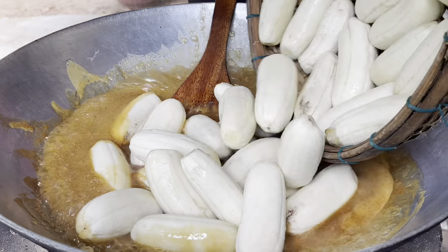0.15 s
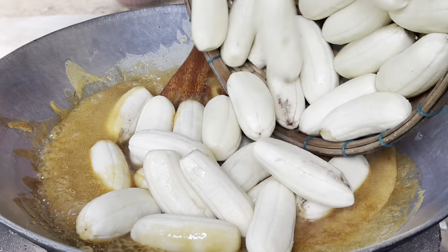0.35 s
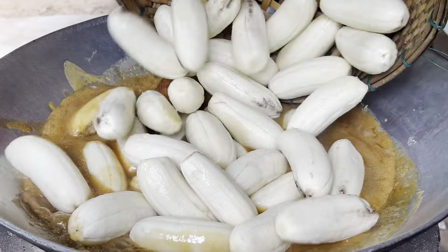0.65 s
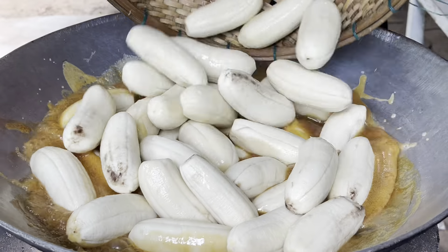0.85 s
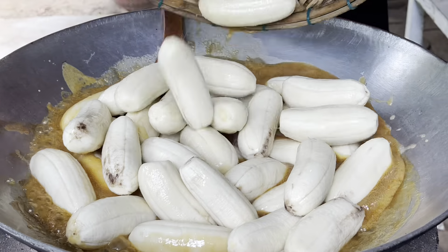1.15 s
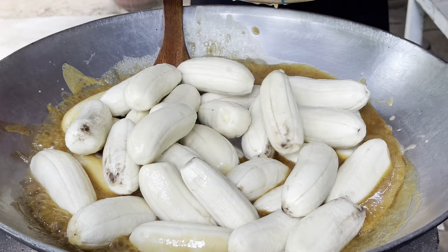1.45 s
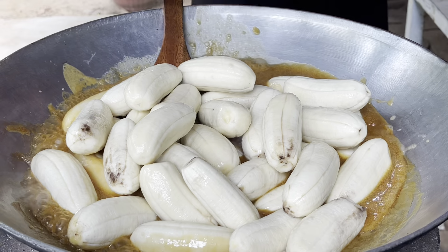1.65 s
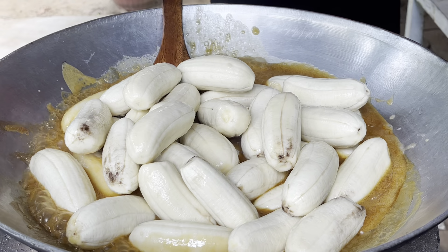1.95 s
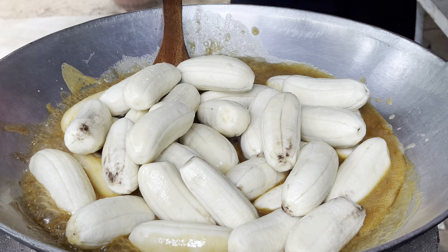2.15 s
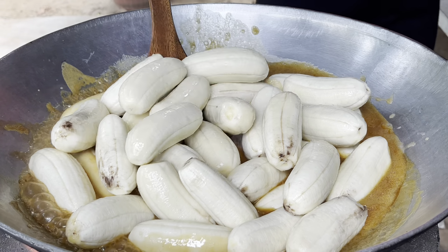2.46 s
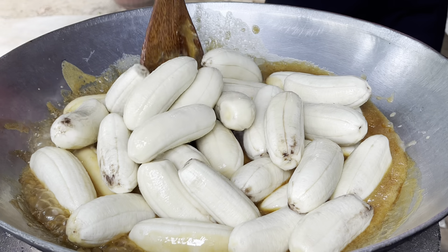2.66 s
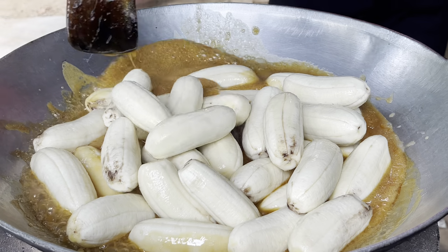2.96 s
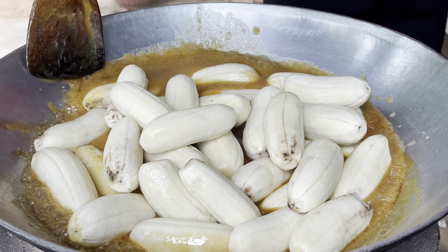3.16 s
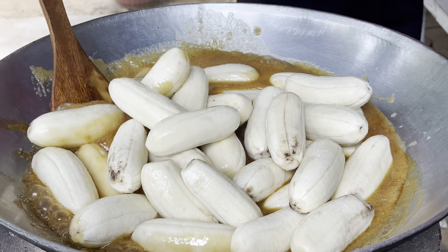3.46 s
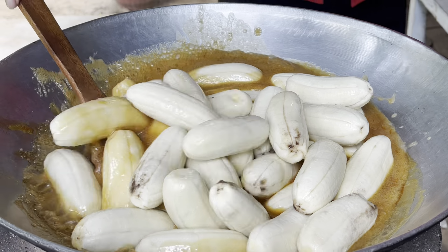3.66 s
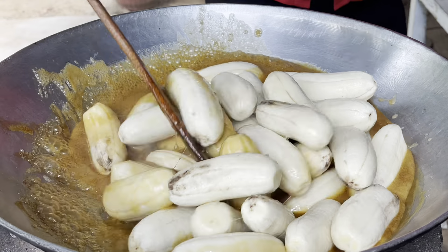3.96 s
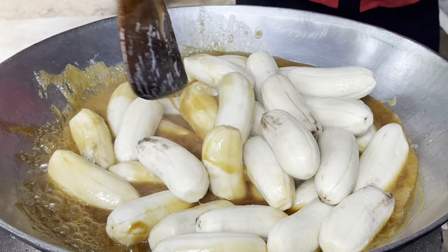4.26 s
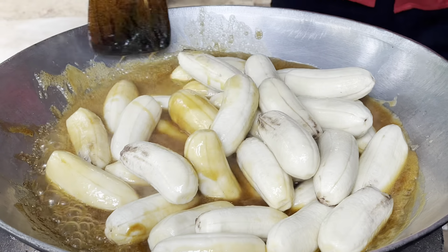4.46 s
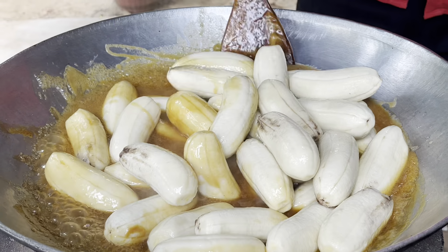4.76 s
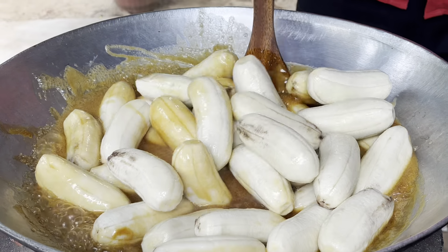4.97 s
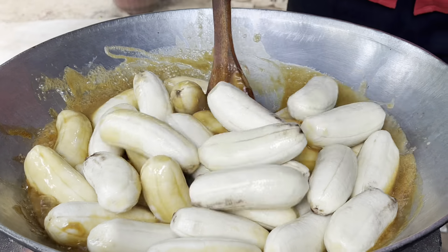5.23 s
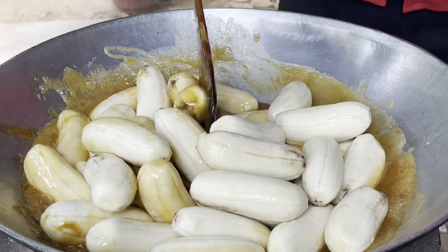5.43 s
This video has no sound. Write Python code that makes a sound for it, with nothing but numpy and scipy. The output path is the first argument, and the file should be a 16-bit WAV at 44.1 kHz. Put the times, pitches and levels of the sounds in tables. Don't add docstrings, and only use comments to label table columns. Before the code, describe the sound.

Close on a steel wok outdoors, syrup simmers with fine hiss and foamy bubbling. Fruit tumbles in with a light tray tap, soft thumps and one sharp burst of steam. Spitting and plopping follow, then a wooden spatula knocks and scrapes the metal before softer, wet stirring. A small engine throbs low in the background.

```python
import sys
import numpy as np
from scipy import signal
from scipy.fft import rfft, irfft, next_fast_len
from scipy.io import wavfile

SR = 44100
rng = np.random.default_rng(int(sys.argv[2]) if len(sys.argv) > 2 else 0)


def wav_record(signal):
    frames = np.transpose(np.atleast_2d(signal))
    bounded = np.clip(frames, -1, 1)
    quanta = np.round(bounded * 32767).astype(np.int16)
    wavfile.write(sys.argv[1], SR, quanta)


def voltage_ratio(level):
    return 10 ** (np.asarray(level, float) / 20)


N = 246959
SIZE = next_fast_len(N + SR // 4)
HZ = np.maximum(np.arange(SIZE // 2 + 1) * SR / SIZE, 1)

# (place [strokes], level [dB])
PUFFS = [
    (0.597, 2.5),
    (1.601, 4),
    (2.15, -4.5),
    (2.6, -4.5),
]
# (time [s], firing rate [strokes/s])
ENGINE_SPEED = [(0, 15.74), (1.2, 15.79), (3.4, 16.25), (4.2, 16.55), (5.0, 16.64), (5.6, 16.64)]
# (frequency [Hz], width [Hz], level [dB])
EXHAUST_PIPE = [(50.1, 30, -3), (61.5, 17.3, -1), (91.8, 9.6, -12.5), (127.4, 8, -21), (31.93, 2.8, -11)]
# (frequency [Hz], level [dB per Hz])
ROAR = [(25, -17), (35, -8), (60, -2.5), (85, -6), (130, -5.5), (160, -16), (300, -26.5), (500, -28.5)]
FIRST_STROKE, ENGINE_DB, ROAR_DB = -.185, -42, -49

# (time [s], level [dB])
BOIL = [(0.0, -50), (0.34, -54.5), (0.61, -52.5), (1.06, -39), (1.43, -44.5), (2.0, -49.5), (2.46, -54),
        (2.68, -49.5), (2.95, -53.5), (3.23, -51), (3.37, -37), (3.52, -46.5), (3.98, -46), (4.5, -52),
        (4.86, -46.5), (5.1, -54.5), (5.44, -57.5), (5.6, -53)]
# (frequency [Hz], level [dB per Hz])
HISS = [(2500, -31.5), (4000, -11), (6500, -5.5), (7500, -3), (8200, -3.5), (9000, -0.5), (10300, 1),
        (11000, -6), (12000, -16), (14000, -29), (15800, -19)]
# (frequency [Hz], level [dB per Hz])
SIMMER = [(1200, -31), (1900, -7), (2250, 0), (2550, -2), (2900, -3.5), (3300, -4.5), (4500, -8),
          (6000, -16)]
# (frequency [Hz], level [dB per Hz])
STEAM = [(600, -40), (1800, -18), (2600, -7.5), (3500, -8.5), (4500, -7), (6000, -4), (7500, -0.5),
         (9000, 2), (10300, 6), (11000, -1), (13000, -15), (14000, -23), (15900, -19)]
# (frequency [Hz], level [dB per Hz])
THUMP = [(110, 3), (200, -1), (330, -5.5), (480, -11), (700, -10)]
# (frequency [Hz], level [dB per Hz])
SLOSH = [(350, -5), (600, -9), (950, 1.5), (1300, -2), (1700, -2.5), (2300, -11.5)]
# (time [s], length [s], syrup level [dB], fruit level [dB])
TUMBLES = [
    (.05, .5, -85, -51.5),
    (.55, 0.097, -67, -47.5),
    (.78, 0.091, -47.5, -40.5),
    (1.0, 0.1, -74, -51),
    (1.43, 0.18, -55, -57),
    (2.4, 1, -52.5, -76),
    (2.88, 0.07, -52.5, -64),
    (3.1, 0.14, -57, -47.5),
]
# (time [s], length [s], syrup level [dB], fruit level [dB], blade level [dB])
STIRS = [(3.387, 0.091, -40, -50, -56), (3.534, 0.11, -62, -44.5, -49), (3.642, 0.044, -47, -42.5, -43.5),
         (3.789, 0.072, -51, -47.5, -47), (3.985, 0.064, -76, -54, -47), (4.29, 0.14, -51, -62, -52),
         (4.58, 0.025, -48, -56.5, -51), (4.703, 0.045, -67, -71, -46), (4.741, 0.065, -49.5, -64, -52),
         (4.832, .05, -45, -73, -51), (4.917, 0.064, -47, -57, -57), (5.034, 0.047, -52, -60, -73)]
MEAN_BOIL_DB = -50
SIMMER_DB, SIMMER_FOLLOWS = -49.5, 0.32
SLOSH_DB, SLOSH_FOLLOWS = -52.5, 0.21
THUMP_DB, THUMP_FOLLOWS = -55.5, 0.035
SWELL_DB = 8.5
FOAM_UNDER_DB, BODY_OVER_DB, BARED_UNDER_DB = -1.5, 7, -5
SPLASH_S, BURST_DB, SWELL_AFTER_S = .724, -25.5, 0.065
STEAM_DB, STEAM_DB_PER_S, LINGER_DB, LINGER_DB_PER_S = -24.5, 85, -36.5, 45
SLOSH_LEFT_DB = 4

# (time [s], peak [dB], t60 [s])
SPITS = [(0.0508, -30, 0.057), (0.722, -20, 0.036), (0.728, -3.5, 0.022), (1.057, -35, 0.032),
         (1.296, -36, .04), (1.326, -23, 0.056), (1.609, -39, 0.027), (1.683, -43, 0.026),
         (2.163, -31, .04), (2.241, -29, 0.043), (2.347, -30, .03), (2.412, -28, 0.043), (2.815, -37, .03),
         (3.126, -30, 0.048), (4.448, -34, 0.036), (4.518, -49, 0.032), (4.71, -39, 0.037),
         (5.226, -35, .04), (5.266, -31.5, 0.047), (5.516, -33, .04), (1.4167, -22, 0.045),
         (1.47, -26.5, 0.72), (1.552, -27, 0.16), (1.753, -27, 0.05), (1.8, -25, 0.079),
         (1.824, -27.5, 0.16), (1.872, -26, 0.074), (1.8894, -27, 0.081), (1.977, -24.5, 0.061),
         (2.0046, -24, 0.05), (2.0857, -26.5, 0.05), (2.108, -27, 0.17), (2.369, -25.5, 0.04),
         (2.486, -29, 0.19), (2.56, -26.5, 0.055), (2.625, -26.5, 0.09), (2.6978, -31, 0.05),
         (2.825, -24.5, 0.025), (2.8844, -31.5, 0.055), (2.9851, -29, 0.05), (3.208, -27, 0.047),
         (3.697, -12, 0.023), (3.949, -25.5, 0.16), (4.131, -30, 0.05), (4.258, -26.5, 0.049),
         (4.574, -26.5, 0.042), (4.6708, -28, 0.059), (4.845, -28.5, 0.13)]
SMALL_SPITS, SMALL_SPIT_DB, SMALL_SPIT_T60_S = 3, -36, 0.06
# (frequency [Hz], level [dB], t60 [s])
SNAP = [(3600, -10, 0.006), (7850, -14, .004), (9100, -2, 0.0071), (11300, -10, 0.0045)]
# (time [s], peak [dB], hardness [dB per octave])
SNAPS = [
    (.7235, -24, 1),
    (.7283, -12, 1.5),
    (.73, -13, -0.5),
    (.7307, -16, -1),
    (.7837, -27, -5),
    (3.6975, -23, 0.5),
    (.5232, -33, -1),
    (1.8734, -31, 3),
]

# (frequency [Hz], level [dB], t60 [s])
RIM = [(655, -4, 0.06), (866, -3, 0.06), (1540, -4.5, 0.46), (2148, 6, 0.31), (2772, -6, .05)]
# (time [s], peak [dB], hardness [dB per octave])
RIM_TAPS = [
    (0.5232, -33, -0.6),
    (.55, -46, -7),
    (0.7627, -36, -2),
]

# (time [s], peak [dB], pitch [Hz], t60 [s])
RINGS = [(0.5445, -37, 664, 0.053), (0.546, -37, 870, 0.059), (3.088, -32, 904, 0.26),
         (3.089, -35, 441, 0.066), (3.091, -33, 280, 0.054), (3.089, -41, 600, .04),
         (3.092, -40, 1090, .06), (3.447, -30, 380, .03), (3.53, -39, 900, .15), (3.553, -37, 900, .1),
         (3.6205, -30, 770, .07), (0.985, -35, 320, .06), (5.22, -41, 330, .06), (4.6, -41, 200, .07),
         (0.5228, -37, 850, .015), (3.412, -20, 4500, .02), (3.638, -32, 950, .08), (3.64, -27, 430, .08),
         (3.693, -36, 900, .12), (3.4055, -18, 9400, .012), (3.4063, -16, 8020, .02),
         (3.4128, -15, 8300, .025), (3.421, -15, 8700, .025), (3.416, -22, 6800, .02),
         (3.43, -22, 7300, .02), (3.4062, -18, 11400, .008), (3.4065, -20, 5600, .015),
         (3.413, -20, 11000, .01), (3.424, -21, 5800, .02), (3.6284, -31, 3500, .015),
         (3.64, -31, 2710, .02), (3.625, -33, 310, .04), (3.629, -36, 940, .05), (4.1324, -33, 11600, .006),
         (4.1326, -40, 14200, .005), (4.2587, -38, 11600, .006), (4.2, -39, 11500, .006),
         (4.8019, -39, 11500, .008), (5.206, -42, 12500, .004), (2.108, -36, 12500, .005),
         (1.8734, -38, 13500, .004), (4.575, -35, 2560, .03), (4.634, -38, 2610, .03),
         (4.71, -37, 1740, .03), (4.715, -42, 5800, .02), (4.85, -41, 5400, .03), (4.855, -40, 4800, .04),
         (4.82, -36, 1005, .04), (4.4, -39, 1280, .03), (5.296, -45, 5170, .03), (3.329, -19, 5000, .015),
         (2.7, -38, 3300, .03), (2.888, -37, 4700, 0.032)]
RING_RISE_CYCLES = 4.4
# (time [s], peak [dB], pitch [Hz], t60 [s])
PLOPS = [(0.552, -41, 312, 0.029), (0.699, -28, 205, 0.024), (0.761, -47, 249, 0.037),
         (0.844, -28.5, 200, 0.034), (0.988, -32, 201, 0.049), (3.211, -30.5, 232, 0.036),
         (3.251, -41, 236, 0.04), (4.56, -35, 300, 0.044), (4.805, -44, 1226, 0.092),
         (4.869, -40, 1250, 0.033), (4.892, -44, 1190, 0.044), (5.026, -40, 862, 0.074),
         (5.205, -27, 930, 0.013), (4.672, -37, 3970, 0.033), (4.712, -47, 4150, .025),
         (4.759, -38.5, 1090, .04), (4.823, -40, 1166, .06), (4.836, -38, 1500, 0.056),
         (4.894, -41, 2240, .025), (4.997, -46, 3250, .03), (5.015, -43, 2980, .035),
         (5.06, -49, 2650, .035), (5.146, -48, 3200, .03), (5.207, -45, 4800, .02),
         (5.406, -46, 3800, 0.033)]

# (frequency [Hz], level [dB], t60 [s])
BOWL = [(440, -7, 0.22), (810, -12, 0.058), (911, -0.6, 0.2), (946, -11, 0.087), (986, -7, 0.09),
        (1064, -14, 0.18), (1402, -8, 0.1), (1846, -15, 0.13), (2000, -26, 0.059)]
# (frequency [Hz], level [dB], t60 [s])
BLADE = [(271, -7.5, 0.061), (357, -13, 0.045), (430, 3.5, 0.05), (479, -3, 0.054), (634, -9, 0.06)]
# (frequency [Hz], level [dB], t60 [s])
EDGE = [(2590, -18, .04), (2760, -15, 0.034), (2975, -6, 0.034), (3130, 1.5, 0.039), (3490, -1, 0.034),
        (3550, -1, 0.024)]
# (frequency [Hz], level [dB], t60 [s])
BELLY = [(790, -4, 0.5)]
# (time [s], peak [dB], hardness [dB per octave])
KNOCKS = [(3.091, -33.5, -5), (3.325, -22, -4), (3.334, -28, 7), (3.347, -27, 12.5), (3.361, -33, 12),
          (3.377, -38, 0), (3.425, -27, 0.5), (3.437, -33, 1), (3.46, -50, 3), (3.489, -39, 2),
          (3.501, -38, 6), (3.53, -43, -1), (3.552, -33.5, -0.4), (3.624, -43, -3), (3.638, -32, 5),
          (3.649, -34, -1), (3.66, -36, -4), (3.696, -31.5, 2), (3.719, -42, 3), (3.779, -46, -7)]
# (time [s], peak [dB], hardness [dB per octave])
THUDS = [(3.088, -36.5, -5), (3.3225, -18, 4), (3.338, -22, 4), (3.347, -32, 3), (3.3535, -17, 2),
         (3.372, -30, 12), (3.3785, -17.5, 1.5), (3.394, -28, -5), (3.408, -36, 2), (3.426, -19, 10),
         (3.431, -24, -3), (3.446, -27, 3), (3.511, -37, 1), (3.523, -38, 6), (3.539, -35, 1),
         (3.556, -41, 6), (3.586, -39, 3), (3.607, -40, 4), (3.625, -34, -9), (3.643, -28, -1),
         (3.655, -34, 1), (3.695, -30, 3), (3.713, -36.5, -9), (3.753, -47, 4), (3.799, -40, 4)]
# (time [s], peak [dB], hardness [dB per octave])
CLINKS = [
    (3.3285, -12, -1.3),
    (3.338, -23, -.4),
    (3.35, -22, 0.26),
    (3.36, -20, .1),
    (3.368, -25, .4),
    (3.4072, -13, -0.048),
    (3.411, -16.5, .1),
    (3.4145, -15.5, .1),
]
# (time [s], peak [dB], hardness [dB per octave])
BELLY_TAP = [
    (3.645, -34, .1),
]
# (time [s], held [s], body [dB], rasp [dB], sizzle [dB])
JABS = [
    (3.315, 0.056, -30.5, -20, -22.5),
    (3.386, 0.012, -51, -38, -46),
    (3.4045, 0.017, -36, -32.5, -18.5),
]
# (frequency [Hz], level [dB per Hz])
RASP = [(900, -32), (1400, -3.5), (2200, 0), (3100, 4.5), (3900, -1), (4800, -1.5), (5500, -3.5)]
# (frequency [Hz], level [dB per Hz])
BARED = [(2500, -11), (5000, -7.5), (6500, -2), (8300, -0.5), (10300, 0.5), (11500, -7.5), (12600, -31)]
BITE = 0.17
RASP_SAG_DB_PER_S, LIFT_DB_PER_S, SIZZLE_HELD_S, SIZZLE_DB_PER_S = 114, 302, 0.01, 311

# (time [s], length [s], start [Hz], end [Hz], level [dB])
WHEEZES = [
    (3.779, .13, 2960, 2735, -47.5),
    (3.881, 0.34, 2590, 2363, -47.5),
    (4.663, 0.1, 5660, 5400, -54),
    (4.8, 0.06, 1150, 1350, -47),
    (4.705, 0.094, 1900, 1746, -49.5),
    (4.899, 0.073, 1144, 938, -53),
    (4.982, 0.11, 3040, 2387, -52.5),
    (5.424, 0.16, 3196, 2380, -56),
]
WHEEZE_WIDTH = .07
# (time [s], length [s], start [Hz], end [Hz], level [dB])
CHIRPS = [(5.255, .1, 5130, 5330, -54), (5.41, .06, 3780, 3760, -53), (4.95, .11, 3720, 3700, -54),
          (5.09, .11, 3260, 3230, -55), (5.412, .06, 3200, 3170, -50), (5.45, .14, 3190, 3160, -53),
          (5.45, .06, 2900, 2850, -55), (5.51, .06, 2600, 2550, -55), (5.3, .1, 3330, 3400, -57),
          (4.84, .09, 4880, 4800, -53)]

# (frequency [Hz], right channel lead [turns], scattered sound [dB])
PORTS = [(60, .014, -32), (150, .05, -22), (260, .035, -30), (440, .03, -30), (750, .09, -13),
         (1400, .04, -12), (2300, 0, -20), (3300, -.09, -13), (5000, -.03, -14), (6800, 0, -17),
         (7800, -.03, -16), (8500, 0, -22), (9300, 0, -11), (12000, 0, -20)]
SLIP_FROM_HZ, HZ_PER_TURN = 8600, 3300
PEAK, CUTOFF_HZ = .62, 16300
QUIET_DB, UNDER_FRAME_DB, UNDER_OTHER_DB, GATE_FROM_HZ = -88.5, -23, -14, 2050


def rms_one(x):
    return x / np.sqrt(np.mean(x ** 2) + 1e-20)


def in_time(rows):
    s, *columns = np.transpose(rows)
    return [np.interp(np.arange(N) / SR, s, c) for c in columns]


def on_hz(rows):
    hz, *columns = np.transpose(rows)
    return [np.interp(np.log(HZ), np.log(hz), c) for c in columns]


def coloured(x, spectrum):
    octaves_below = np.maximum(np.log2(spectrum[0][0] / HZ), 0)
    octaves_above = np.maximum(np.log2(HZ / spectrum[-1][0]), 0)
    gain = voltage_ratio(on_hz(spectrum)[0] - 19 * (octaves_below + octaves_above))
    return rms_one(irfft(rfft(x, SIZE) * gain, SIZE)[:N])


def bandpass(x, low_hz, high_hz):
    return signal.sosfilt(signal.butter(2, [low_hz, high_hz], "band", fs=SR, output="sos"), x)


def drift(rate):
    r = np.exp(-80 * np.pi * rate / SR)
    slow = signal.lfilter([1], [1, -2 * r, r * r], rng.standard_normal(N // 40 + 2002))[2000:]
    return np.interp(np.arange(N) / 40, np.arange(len(slow)), rms_one(slow))


def ring(clicks, hz, t60):
    r, w = voltage_ratio(-60 / (t60 * SR)), 2 * np.pi * hz / SR
    return signal.lfilter([0, np.sin(w)], [1, -2 * r * np.cos(w), r * r], clicks + 1e-18)


def grains(per_s, spread_db):
    sizes = voltage_ratio(spread_db * np.minimum(rng.exponential(1, N), 5)) * rng.choice([-1, 1], N)
    return rms_one(sizes * (rng.random(N) < per_s / SR))


def bubbling(spectrum, per_s, spread_db, patchy_db, shared_db):
    octaves = np.log2(spectrum[-1][0] / spectrum[0][0])
    edges = spectrum[0][0] * .7 * 2 ** np.arange(0, octaves + 1.2, .5)
    edges = np.minimum(edges, .47 * SR)
    clicks = [grains(per_s, spread_db), grains(per_s, spread_db)]
    out = 0
    for k, (low, high) in enumerate(zip(edges, edges[1:])):
        if high > low:
            out = out + voltage_ratio(patchy_db * drift(18.7)) * bandpass(clicks[k % 2], low, high)
    return coloured(out, spectrum) * voltage_ratio(shared_db * (drift(11.5) + 0.074 * drift(24)))


def struck(hits, modes, scatter_db, below_db):
    rows, out = np.array(hits), np.zeros(N)
    chance = rng.standard_normal((len(rows), len(modes)))
    for k, (hz, level_db, t60) in enumerate(modes):
        clicks = np.zeros(N)
        level_db = level_db - below_db + rows[:, 2] * np.log2(hz / 600) + scatter_db * chance[:, k]
        clicks[(rows[:, 0] * SR).astype(int)] = voltage_ratio(rows[:, 1] + level_db)
        out += ring(clicks, hz, t60)
    return out


def swell(s, attack, hold, peak_db, fall_db_per_s, sag_db_per_s=0):
    t = np.arange(N) / SR - s
    lost_db = sag_db_per_s * np.clip(t - attack, 0, hold) + fall_db_per_s * np.maximum(t - attack - hold, 0)
    return np.clip(t / attack, 0, 1) ** 2 * voltage_ratio(peak_db - lost_db)


def heaves(rows, column, over_db=0):
    t = np.arange(0, N + 64, 64) / SR
    power = sum(voltage_ratio(row[column] + over_db - SWELL_DB * np.abs(t - row[0]) / row[1]) ** 2 for row in rows)
    return np.interp(np.arange(N) / SR, t, np.sqrt(power))


def stirred_up(steady_db, follows, column, over_db=0):
    steady = voltage_ratio(steady_db + follows * (in_time(BOIL)[0] - MEAN_BOIL_DB))
    return 20 * np.log10(np.hypot(steady, heaves(TUMBLES + STIRS, column, over_db)))


def engine():
    strokes = FIRST_STROKE + np.cumsum(in_time(ENGINE_SPEED)[0]) / SR
    puffs = np.zeros(N)
    for place, level_db in PUFFS:
        at = np.flatnonzero(np.diff(np.floor((strokes - place) / 3)) > 0)
        puffs[at] = voltage_ratio(level_db + 0.79 * rng.standard_normal(40)[:len(at)])
    puffs[0] = voltage_ratio(1.0)
    throb = 0
    for hz, width, level_db in EXHAUST_PIPE:
        t60 = np.log(1000) / (np.pi * width)
        throb = throb - voltage_ratio(level_db) * rms_one(ring(ring(puffs, hz, t60), hz, t60))
    return voltage_ratio(ENGINE_DB) * throb + voltage_ratio(ROAR_DB) * coloured(rng.standard_normal(N), ROAR)


def syrup():
    hiss_db = in_time(BOIL)[0]
    hiss = voltage_ratio(hiss_db + 4.0) * bubbling(HISS, per_s=4500, spread_db=3.0, patchy_db=1.55, shared_db=1.0)
    top = signal.sosfiltfilt(signal.butter(2, 10500, "high", fs=SR, output="sos"), hiss)
    hiss = hiss + (voltage_ratio(0.32 * np.minimum(hiss_db + 39.5, 0)) - 1) * top

    simmer_db = stirred_up(SIMMER_DB, SIMMER_FOLLOWS, column=2, over_db=FOAM_UNDER_DB)
    foam = bubbling(SIMMER, per_s=5000, spread_db=1.5, patchy_db=1.5, shared_db=0.77)
    simmer = voltage_ratio(simmer_db + 0.75) * foam

    burst = swell(SPLASH_S, 0.003, 0, BURST_DB, 180)
    billow = swell(SPLASH_S, SWELL_AFTER_S, 0, STEAM_DB, STEAM_DB_PER_S)
    linger = swell(SPLASH_S, SWELL_AFTER_S, 0, LINGER_DB, LINGER_DB_PER_S)
    splash = np.hypot(burst + billow, linger) * coloured(grains(5000, spread_db=4.2), STEAM)

    thump_db = stirred_up(THUMP_DB, THUMP_FOLLOWS, column=3)
    thump = voltage_ratio(thump_db - 1.5) * bubbling(THUMP, per_s=600, spread_db=2.0, patchy_db=3.0, shared_db=1.8)
    return hiss + simmer + splash + thump


def slosh():
    wash = bubbling(SLOSH, per_s=2500, spread_db=2.0, patchy_db=1.0, shared_db=0.88)
    born, dealt = grains(260, spread_db=3.5), rng.integers(0, 14, N)
    bubbles = sum(ring(born * (dealt == k), hz, 8.8 / hz) for k, hz in enumerate(np.geomspace(700, 1800, 14)))
    slosh_db = stirred_up(SLOSH_DB, SLOSH_FOLLOWS, column=2)
    stirred = voltage_ratio(1.04 * (slosh_db + 49.0) - 10.5)
    return voltage_ratio(slosh_db - 1.5) * (wash + stirred * rms_one(bubbles))


def spits():
    level = np.zeros(N)
    chance = rng.random((SMALL_SPITS, 2))
    small = [(s * N / SR, SMALL_SPIT_DB + 8 * (d - .5), SMALL_SPIT_T60_S) for s, d in chance]
    for s, peak_db, t60 in SPITS + small:
        i, t = int(s * SR), np.arange(int(t60 * SR)) / SR
        fizz = voltage_ratio(peak_db - 9.5 - 60 * t / t60) * np.minimum(t / 0.0021, 1)
        level[i:i + len(t)] += fizz[:N - i]
    spray = coloured(grains(6000, spread_db=1.0), HISS)
    spray = spray + 0.071 * coloured(grains(6600, spread_db=6.5), SIMMER)
    return level * spray + struck(SNAPS, SNAP, scatter_db=0.0, below_db=7.5)


def rim_taps():
    return struck(RIM_TAPS, RIM, scatter_db=1.0, below_db=9.0)


def rings():
    out = np.zeros(N)
    for s, peak_db, hz, t60 in RINGS:
        i, t = int(s * SR), np.arange(int(t60 * SR)) / SR
        level = voltage_ratio(peak_db - 60 * t / t60) * np.minimum(t * hz / RING_RISE_CYCLES, 1)
        out[i:i + len(t)] += level * np.sin(2 * np.pi * hz * t)
    return out


def plops():
    out, snaps = np.zeros(N), np.zeros(N)
    for s, peak_db, hz, t60 in PLOPS:
        i, t = int(s * SR), np.arange(int(t60 * SR)) / SR
        tone = np.sin(2 * np.pi * hz * t * (0.93 + 5.4 * t)) * np.minimum(t * hz, 1)
        out[i:i + len(t)] += voltage_ratio(peak_db + 2.0 - 60 * t / t60) * tone
        snaps[i] = voltage_ratio(peak_db + 7.0)
    return out + bandpass(snaps, 500, 6000)


def spatula_blows():
    blows = struck(KNOCKS, BOWL, scatter_db=5.0, below_db=7.0)
    blows = blows + struck(THUDS, BLADE, scatter_db=2.0, below_db=4.5)
    blows = blows + struck(BELLY_TAP, BELLY, scatter_db=0.0, below_db=-1.0)
    soft = bandpass(blows, 170, 1600)
    return soft + struck(CLINKS, EDGE, scatter_db=5.0, below_db=11.5)


def spatula_drag():
    shake = heaves(STIRS, column=3, over_db=BODY_OVER_DB)
    rub = heaves(STIRS, column=4)
    bared = heaves(STIRS, column=4, over_db=BARED_UNDER_DB)
    for s, held, body_db, rasp_db, sizzle_db in JABS:
        shake = shake + swell(s, BITE * held, held, body_db, 600)
        rub = rub + swell(s, BITE * held, held, rasp_db, LIFT_DB_PER_S, RASP_SAG_DB_PER_S)
        bared = bared + swell(s, BITE * held, SIZZLE_HELD_S, sizzle_db, SIZZLE_DB_PER_S)
    slips = shake * grains(1500, spread_db=2.5)
    body = sum(voltage_ratio(level_db) * ring(slips, hz, 0.13 * t60) for hz, level_db, t60 in BOWL + BLADE)
    drag = rms_one(body) * np.sqrt(np.mean(slips ** 2)) * voltage_ratio(-3.5)
    rasp = rub * bubbling(RASP, per_s=2500, spread_db=1.5, patchy_db=1.5, shared_db=0.0)
    sizzle = bared * bubbling(BARED, per_s=7900, spread_db=3.0, patchy_db=-0.4, shared_db=1.1)
    return drag + rasp + sizzle


def wheezes():
    out = np.zeros(N)
    for s, length, start_hz, end_hz, level_db in WHEEZES:
        i, t = int(s * SR), np.arange(int(length * SR)) / SR
        r = np.exp(-2 * np.pi * WHEEZE_WIDTH * start_hz / SR)
        a, b = signal.lfilter([1], [1, -2 * r, r * r], rng.standard_normal((2, SR)))[:, :len(t)]
        phase = 2 * np.pi * np.cumsum(np.geomspace(start_hz, end_hz, len(t))) / SR
        band = rms_one(a * np.cos(phase) + b * np.sin(phase)) * np.sqrt(np.sin(np.pi * t / length))
        out[i:i + len(t)] += voltage_ratio(level_db) * band[:N - i]
    return out


def birds():
    out, waver = np.zeros(N), drift(56)
    for s, length, start_hz, end_hz, level_db in CHIRPS:
        i, t = int(s * SR), np.arange(int(length * SR)) / SR
        hz = np.linspace(start_hz, end_hz, len(t)) * (1 + .007 * waver[i:i + len(t)])
        whistle = np.sin(2 * np.pi * np.cumsum(hz) / SR)
        out[i:i + len(t)] += voltage_ratio(level_db) * np.sin(np.pi * t / length) * whistle
    return out


def ports(x):
    turns, scattered_db = on_hz(PORTS)
    smear = rng.standard_normal(SR // 40) * voltage_ratio(-np.linspace(0, 40, SR // 40))
    direct = rfft(x, SIZE)
    scattered = irfft(direct * rfft(smear / np.linalg.norm(smear), SIZE) * voltage_ratio(scattered_db), SIZE)[:N]
    lead = np.exp(1j * np.pi * (turns + np.maximum(HZ - SLIP_FROM_HZ, 0) / HZ_PER_TURN))
    pair = irfft([direct / lead, direct * lead], SIZE)[:, :N]
    return pair + [[1], [-1]] * scattered * voltage_ratio(2.2 * drift(7) - 2.0)


def scene():
    wok = syrup() + spits() + rim_taps() + rings() + plops() + spatula_blows() + spatula_drag() + wheezes()
    lean_left = voltage_ratio(SLOSH_LEFT_DB * np.array([[.5], [-.5]]))
    return ports(engine() + wok + birds()) + ports(slosh()) * lean_left


def drop_quiet(x):
    hz, _, z = signal.stft(np.array([x[0] + x[1], x[0] - x[1]]) / 2, SR, nperseg=1024)
    bands = np.abs(z[:, :512].reshape(2, 64, 8, -1)) ** 2
    power = np.repeat(np.mean(bands, axis=2), 8, axis=1)
    floor = np.maximum(voltage_ratio(2 * QUIET_DB), voltage_ratio(2 * UNDER_FRAME_DB) * power[0].mean(axis=0))
    kept = (power > floor) & (power > voltage_ratio(2 * UNDER_OTHER_DB) * power[::-1])
    z[:, :512] *= kept | (hz[:512, None] < GATE_FROM_HZ)
    mid, side = signal.istft(z, SR, nperseg=1024)[1][:, :N]
    return np.array([mid + side, mid - side])


def band_limit(x):
    return signal.sosfilt(signal.butter(12, 16950, fs=SR, output="sos"), x)


def record(dry):
    rounded = PEAK * np.tanh(dry / PEAK)
    x = signal.sosfilt(signal.butter(6, 27, "high", fs=SR, output="sos"), rounded)
    x = signal.sosfilt(signal.cheby2(18, 70, CUTOFF_HZ, fs=SR, output="sos"), x)
    return band_limit(drop_quiet(x))


dry = scene()
out = record(dry)
wav_record(out)
```